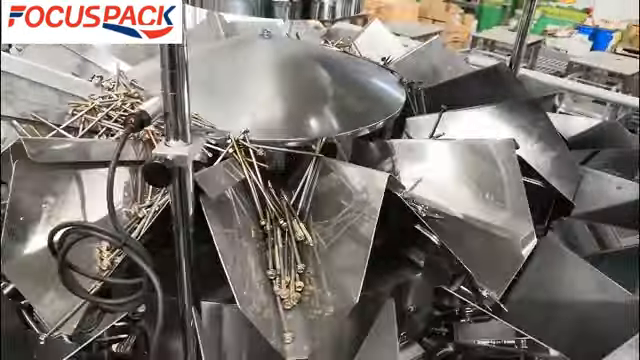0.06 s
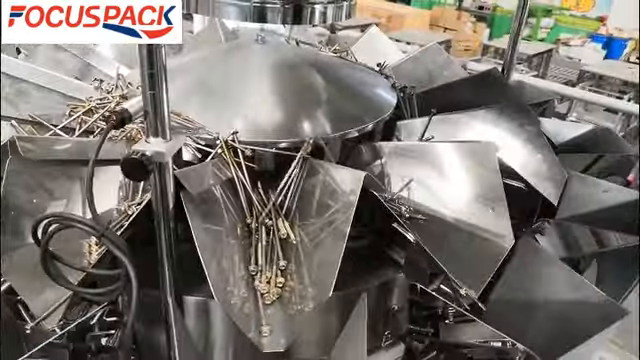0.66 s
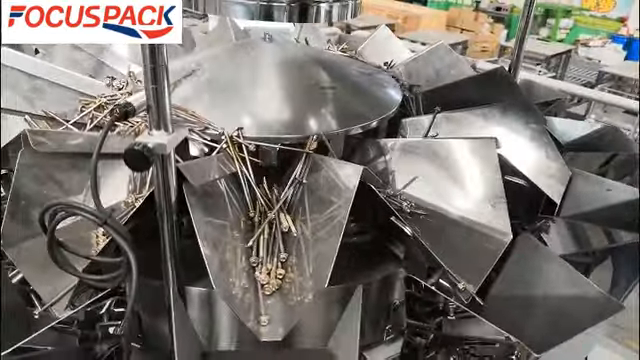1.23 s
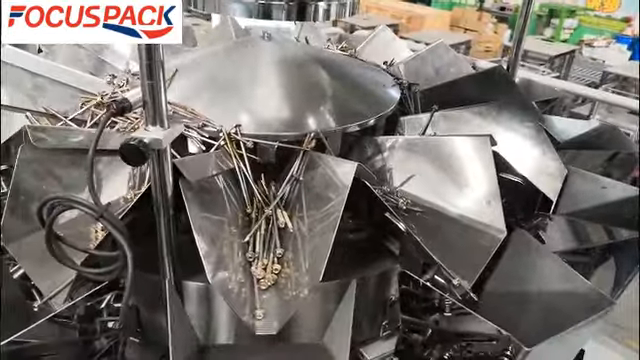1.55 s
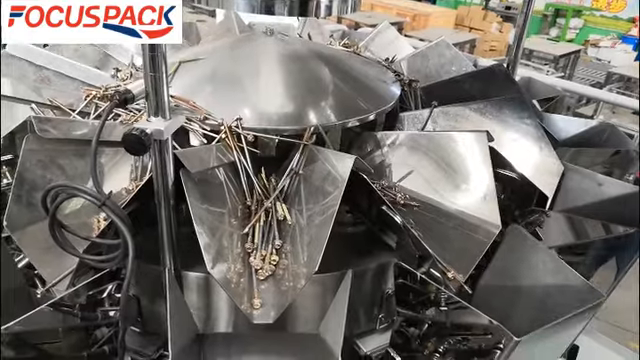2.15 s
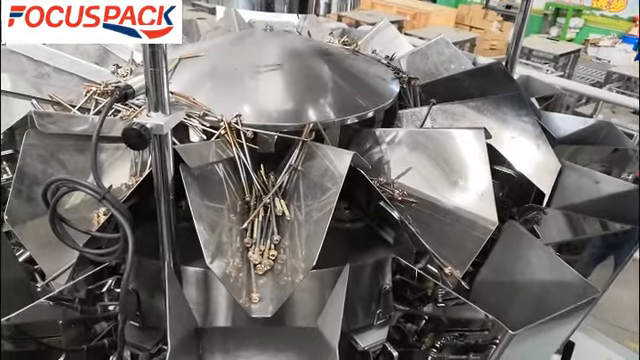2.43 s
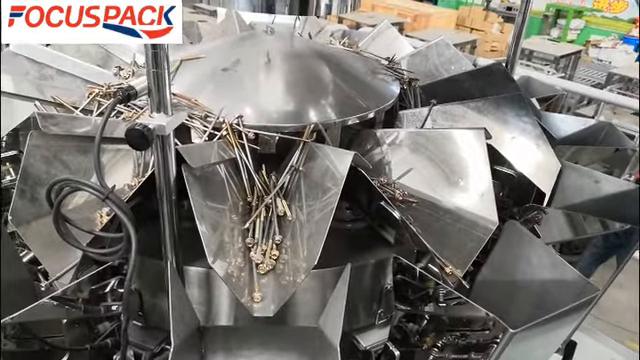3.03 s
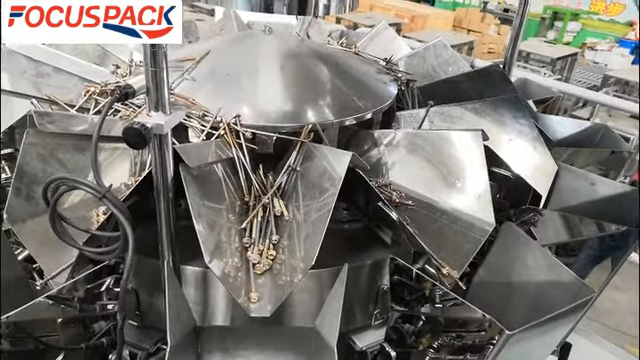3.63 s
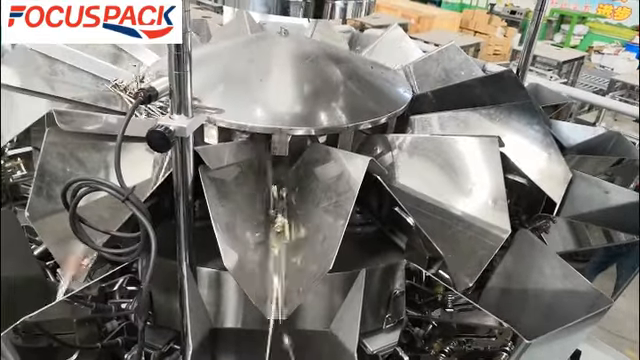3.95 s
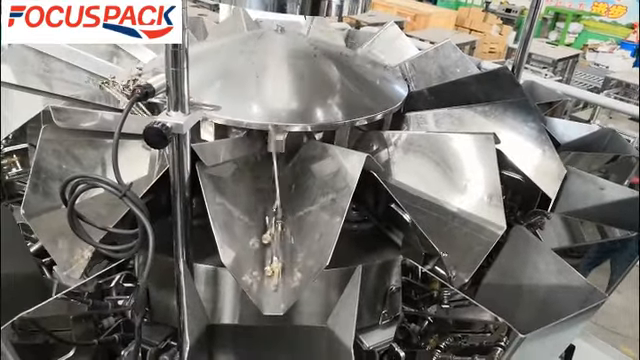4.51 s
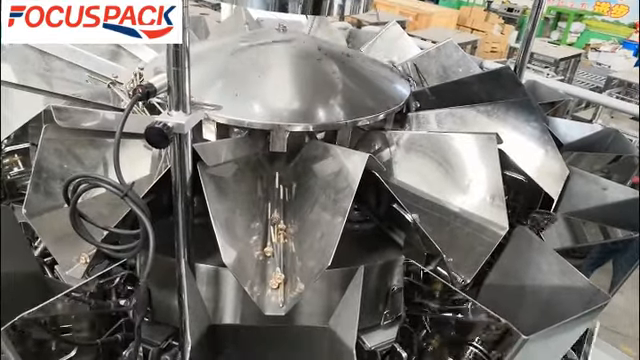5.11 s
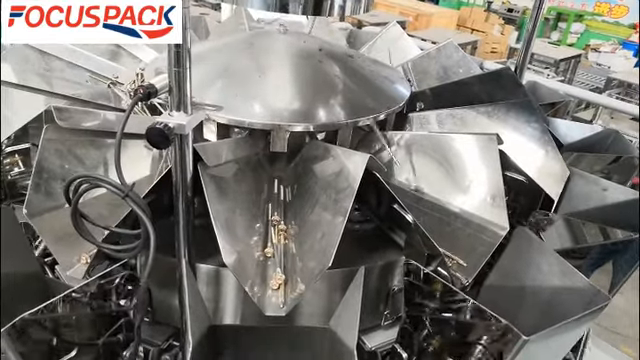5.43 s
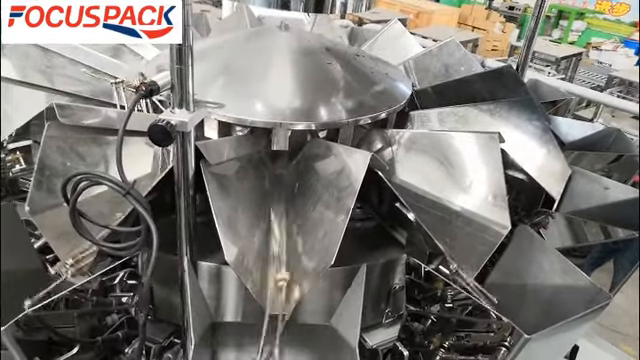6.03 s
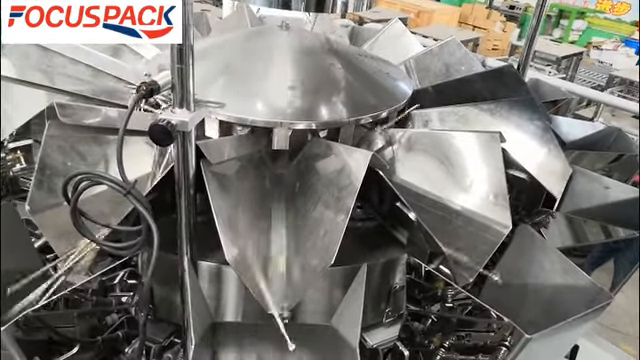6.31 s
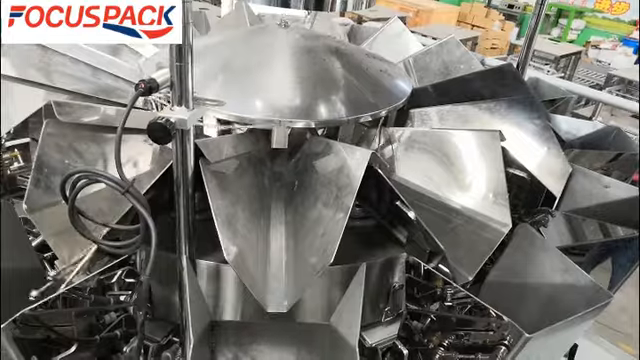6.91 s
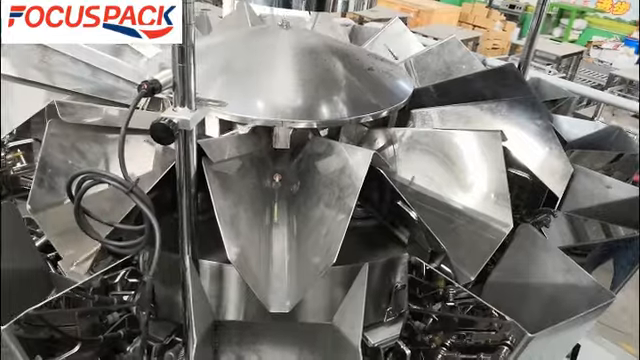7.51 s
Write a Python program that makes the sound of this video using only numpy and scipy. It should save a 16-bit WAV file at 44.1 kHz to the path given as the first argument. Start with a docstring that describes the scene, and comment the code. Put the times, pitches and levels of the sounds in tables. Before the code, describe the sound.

A steel clang opens the sound, close to a stereo microphone at a weighing machine in a factory hall. Until about 3.5 seconds, long screws drop one by one at an uneven pace, several each second, and bounce on sheet-steel pans. Each contact gives a bright clink, a brief ring of pans and chutes, and a dull thud. Hard landings overload the microphone with an abrupt low thump, and some add a hollow tock. From about 3.7 seconds to the end, near 7.8 seconds, the screws slide and tumble in a dense rattle, with a strong hit at 4.4 and a longer ring at 5.4. Loose screws buzz on the shaking pans in short runs, mostly around 2.6 to 3.4, 3.9 to 5 and from 6.2 onward. The drive hums underneath throughout over steady hall noise, swelling a little near 6 seconds.

```python
"""A steel clang, then long screws drop one by one and bounce on the pans of a multihead weighing machine.
From about 3.7 s they slide and tumble in a dense rattle. Each contact rings the screws, chutes and pans
and gives a dull thud; hard landings overload the close stereo microphone with an abrupt low thump.
Loose screws buzz on the shaking pans. The drive hums in the factory hall throughout."""
import sys
import numpy as np
from scipy import signal
from scipy.fft import rfft, irfft
from scipy.io import wavfile
from scipy.ndimage import uniform_filter1d, minimum_filter1d

SR = 44100
rng = np.random.default_rng(int(sys.argv[2]) if len(sys.argv) > 2 else 0)


def pcm_store(signal):
    """Save signal as 16-bit PCM."""
    levels = np.round(np.clip(np.atleast_2d(signal), -1, 1) * 32767)
    wavfile.write(sys.argv[1], SR, levels.astype(np.int16).T)


N = 342216
T = np.arange(N) / SR
RING_T = T[:SR // 2]

# drive hum partials: (frequency [Hz], base level [dB])
HUM_PARTIALS = [(100, -45), (450, -44.5)]
# hum swell: (time [s], gain [dB])
HUM_SWELL = [(0, -6), (1, -12), (3, -10), (3.8, -3), (5, -4), (5.8, 3), (7, 2), (7.76, -3)]
# how hard the heap of screws slides: (time [s], flow [dB])
HEAP_FLOW = [(0, -27), (.45, -28), (.58, -29.5), (.9, -27), (1.75, -29.5), (2.45, -27.5), (2.68, -23),
             (2.82, -25), (3.02, -23), (3.64, -28), (3.72, -19.5), (4.3, -23), (5.1, -22), (5.55, -24.5),
             (5.9, -20.5), (6.4, -20.5), (7.25, -22.5), (7.4, -24), (7.76, -21.5)]
# heavy screws landing: (time [s], strength [dB], thud [dB], bounce decay [s])
HEAVY_DROPS = [(0.0481, -4, -27, 0.0067), (0.067, -6, -24, 0.015), (0.1894, 0.5, -29, 0.0035),
               (0.2275, -11, -42, 0.005), (0.2843, -5.5, -33.5, 0.019), (0.356, -1, -25.5, .006),
               (0.394, -7, -49, 0.037), (0.4877, -4, -23.5, 0.0097), (0.5273, -5, -14.5, 0.0037),
               (.579, -19, -46, .005), (0.6872, -1.5, -32, 0.022), (0.789, 2.5, -18, 0.0095),
               (0.837, -2, -46, 0.0028), (0.8599, -2, -34, 0.01), (0.897, -1, -14, 0.0085),
               (.912, -3, -20.5, 0.015), (0.9855, -0.5, -15.5, 0.0074), (1.004, -3, -20, 0.0044),
               (1.047, -6.5, -39, 0.016), (1.0755, -2, -19.5, 0.0059), (1.1538, -1, -25.5, 0.0027),
               (1.2238, -3, -31, 0.014), (1.256, -5.5, -44, 0.032), (1.29, -11, -40, 0.025),
               (1.309, -0.5, -18, 0.019), (1.46, -7, -35, 0.0084), (1.497, 1, -15.5, 0.0035),
               (1.5298, -4.5, -30, 0.0049), (1.6266, -7.5, -29, 0.029), (1.7723, -2, -16.5, 0.0067),
               (1.826, -6, -37, 0.022), (1.924, -8.5, -33, 0.016), (1.9965, -1.5, -13, 0.0056),
               (2.055, -6.5, -33, 0.0064), (2.1272, 1.5, -24, 0.015), (2.1757, -0.5, -15, 0.0034),
               (2.2219, -2, -16, 0.016), (2.272, 1.5, -15, 0.004), (2.3517, -6, -22.5, 0.008),
               (2.3689, 0, -20.5, 0.016), (2.7033, -10, -36, 0.0075), (2.753, -1.5, -29, 0.0083),
               (2.877, -1.5, -18.5, 0.019), (2.9493, -3, -16.5, 0.03), (2.9789, -2, -18.5, 0.025),
               (3.0984, -4, -24, 0.0044), (3.1771, 1, -15.5, 0.014), (3.27, -11, -44, .008),
               (3.2879, -4.5, -25, 0.018), (3.372, -1.5, -26, 0.011), (3.462, -6.5, -25, 0.0085),
               (3.693, -7, -25, 0.081), (3.778, -18, -21, 0.0083), (3.8392, -2, -22, 0.043),
               (3.8894, -6, -24, 0.04), (3.916, -6, -19.5, 0.022), (4.04, -13, -22.5, 0.013),
               (4.1992, -9, -33, .008), (4.24, -8, -23, 0.047), (4.3743, -9.5, -27, 0.033),
               (4.4334, 2, -12, 0.019), (4.523, -1.5, -21.5, 0.0067), (4.562, -10, -25, 0.0046),
               (4.63, -1.5, -19, 0.016), (4.749, -4, -20.5, 0.032), (4.887, -8.5, -25, 0.024),
               (4.976, -8, -42, .006), (5.01, -5.5, -39, 0.0061), (5.0572, -5.5, -21.5, 0.059),
               (5.0836, -8, -19, 0.044), (5.2187, -1, -17.5, 0.0055), (5.322, -7, -38, 0.0091),
               (5.375, -5, -34, 0.008), (5.414, -6, -23.5, 0.026), (5.5821, -12, -24, 0.019),
               (5.666, -24, -29, 0.013), (5.754, -7, -22, 0.008), (5.858, -2, -19.5, 0.025),
               (5.921, 1, -25, 0.01), (5.94, -5, -20, 0.0087), (6.019, -6, -19.5, 0.0092),
               (6.12, -4, -21, 0.019), (6.183, -1, -21, 0.017), (6.277, -8, -22.5, 0.021),
               (6.3042, -3.5, -20.5, 0.0073), (6.459, -3, -16, 0.0076), (6.5888, -8, -20.5, .016),
               (6.733, -11, -26, 0.008), (6.759, -4, -19, 0.015), (6.919, -15, -32, 0.011),
               (6.936, -6, -23, 0.0073), (6.958, -6, -21, 0.017), (7.0743, -3.5, -21, 0.017),
               (7.1892, -10, -30, 0.0064), (7.223, -2, -29, 0.0073), (7.282, -2, -28, 0.026),
               (7.3194, -3, -24.5, 0.015), (7.34, -10, -24, 0.0067), (7.459, -1.5, -20, 0.039),
               (7.743, -10, -23.5, 0.014)]
# screws tumbling down a chute: (time [s], level [dB], bounce decay [s])
TUMBLES = [(.0024, -16, 0.021), (.048, -16, 0.0045), (0.0665, -15, .02), (0.6873, -15.5, .03),
           (.8963, -15, 0.036), (1.9386, -17, 0.029), (2.0555, -20, 0.056), (2.126, -22.5, 0.061),
           (2.5325, -18, 0.033), (2.7028, -18, 0.014), (4.522, -21, .008), (4.631, -16, .011),
           (5.0575, -17, 0.063), (5.217, -16, 0.0062), (5.757, -15, 0.013), (6.957, -23, 0.0099),
           (7.2815, -23, 0.033), (7.459, -25, .03)]
# single modes of a struck panel or screw: (time [s], frequency [Hz], level [dB], t60 [s])
CLANGS = [(0.003, 2480, -12, 0.13), (0.003, 3670, -12, 0.1), (0.047, 2790, -25, 0.55),
          (0.227, 1490, -18, 0.17), (0.228, 1755, -13.5, 0.17), (0.227, 1430, -28, 0.088),
          (0.227, 3580, -25.5, 0.41), (0.7, 2276, -18, 0.53), (0.688, 3700, -26, 0.58),
          (0.897, 3560, -31, 0.25), (.358, 6600, -13, .07), (.488, 9680, -15, .09), (0.789, 8070, -12, .07),
          (1.157, 8010, -17, 0.12), (1.289, 9390, -18, .06), (1.498, 7130, -14, .06),
          (1.497, 9650, -9, 0.056), (1.53, 8300, -21, 0.24), (1.773, 9470, -14, 0.077),
          (1.924, 9720, -16, .06), (2.128, 8960, -6, .07), (2.352, 9700, -16, .06), (2.885, 6630, -14, .07),
          (3.372, 8080, -17, .07), (3.634, 8100, -15.5, .08), (1.632, 1314, -24.5, 0.58),
          (1.66, 1780, -17.5, 0.26), (1.629, 2730, -23.5, 0.42), (2.706, 1804, -12, 0.12),
          (2.753, 2250, -25, 0.22), (4.255, 7750, -17, .09), (4.478, 5800, -14, 0.083),
          (5.218, 7750, -16, 0.084), (5.41, 1684, -17, 1), (5.411, 1760, -15, 0.65),
          (5.757, 2250, -19, 0.36), (5.94, 8100, -12, 0.083), (6.024, 1766, -14.5, 0.29),
          (6.119, 8400, -17, 0.21), (6.918, 5685, -16, .09), (7.188, 7830, -17, 0.25),
          (7.281, 6370, -13, .08)]
# screws chattering on a pan: (start [s], end [s], mode [Hz], level [dB], strike scatter [ms])
CHATTER_RUNS = [(.25, .5, 2255, -32, .12), (.96, 1.36, 3640, -38, .2), (1.22, 1.34, 2250, -29, .12),
                (2.628, 2.837, 2255, -29, .09), (2.7, 2.8, 1803, -30, .08), (2.9, 3.07, 2255, -26.5, .09),
                (2.949, 3.06, 2070, -26, .1), (3.202, 3.423, 2250, -28.5, .09),
                (3.898, 4.1, 3610, -30.5, .06), (3.98, 4.28, 2250, -25.5, .12),
                (4.36, 4.72, 3600, -30, .065), (4.6, 5.03, 2066, -24.5, .09),
                (4.722, 5.02, 1770, -27.5, .1), (4.8, 5.08, 1538, -28.5, .08),
                (4.867, 5.02, 1690, -28.5, .09), (6.22, 6.6, 2245, -27, .14),
                (6.25, 6.52, 2066, -24.5, .08), (6.892, 7.104, 2245, -30, .1),
                (7.059, 7.42, 2066, -26.5, .08), (7.24, 7.42, 1800, -27, .12),
                (7.253, 7.455, 2265, -27.5, .1), (7.38, 7.72, 1975, -29.5, .16)]
# hollow tocks with some landings: (time [s], level [dB])
TOCKS = [(.528, -20.5), (.79, -27), (.897, -24), (1.498, -25), (1.773, -26), (1.998, -22), (2.226, -21.5),
         (2.369, -24), (3.373, -23.5), (3.779, -25), (3.903, -24), (4.019, -24), (4.454, -22), (4.563, -27),
         (4.633, -20.5), (5.218, -27), (5.923, -25), (6.303, -23), (6.959, -26), (7.083, -25)]
# modes of the steel parts and of the tock: (frequency [Hz], relative level [dB])
CHUTE_MODES = [(2777, -1.0), (2853, -3.0), (3100, -7.0), (3343, -6.0), (3552, -3.0), (3606, 0.0),
               (3682, -3.0), (3784, -3.0), (3956, -7.0), (3994, -7.0), (4317, -7.0)]
SCREW_MODES = [(4608, -3.0), (4651, 0.0), (5065, -2.0), (5447, -3.0), (5539, -3.0), (5830, -2.0),
               (5953, -1.0), (6206, -2.0), (6416, -2.0), (6621, -1.0), (6896, -5.0), (7251, -4.0),
               (8220, -1.0), (8327, -1.0), (8586, -3.0), (8833, -3.0), (9076, -3.0), (9582, -1.0),
               (9614, -3.0), (9727, -3.0), (9910, -6.0), (10125, -8.0), (11983, -17.0), (12042, -19.0),
               (12203, -19.0), (12230, -19.0)]
PAN_MODES = [(1313, -14.5), (1421, -13), (1507, -29), (1539, -2), (1571, -58), (1641, -12), (1690, -10),
             (1765, 5.5), (1803, -3.5), (1986, -22.5), (2067, 6.5), (2217, 3), (2244, 4), (2293, 0.5),
             (2411, -6), (2444, -25.5), (2487, 2), (2535, -18.5), (2680, -0.5), (2707, -2.5)]
TOCK_MODES = [(320, -2), (520, -4), (700, -5), (880, -1), (1040, 0), (1200, 0), (1380, -3)]
# spectra of the hall noise, the contacts and the overload thump: (frequency [Hz], relative level [dB])
HALL_SPECTRUM = [(20, 12), (50, 1), (75, -6), (120, 2), (300, 3), (620, -5.5), (1100, -8), (3000, -21.5),
                 (10000, -34)]
CHUTE_SPECTRUM = [(1200, -39), (2300, -3), (2800, -4.5), (3200, -7), (3700, -5.5), (4200, -7), (6500, -9.5),
                  (13000, -65)]
SCREW_SPECTRUM = [(1500, -33), (3500, -23.5), (4600, -4), (6000, -2), (7000, -3), (8000, -1), (9000, -1),
                  (9800, -2.5), (10500, -9.5), (11600, -16), (12100, -24), (13000, -15.5), (15000, -36)]
PAN_SPECTRUM = [(450, -28), (850, -7), (1350, -5.5), (1600, -0.5), (1800, 0), (2200, 0.5), (2500, -5.5),
                (3100, -22.5), (5000, -27.5), (13000, -32)]
THUD_SPECTRUM = [(12, -22), (30, 0), (110, 0.5), (220, -1), (350, -3), (480, -1), (640, -5), (1100, -12.5),
                 (2000, -15), (5000, -44), (13000, -31)]
CRACK_SPECTRUM = [(100, -16), (600, -12), (1300, -1), (2500, 0), (4000, -2.5), (6500, -5), (10000, -14),
                  (15000, -40)]
THUMP_SPECTRUM = [(12, -18), (35, -1.5), (90, 1), (230, -1), (350, -2), (550, -5.5), (1100, -5.5),
                  (1500, -9), (2500, -13), (5000, -22), (13000, -45)]
# pans round the microphone: (base left lead [ms], left minus right [dB])
PAN_PLACES = [(.6, 1), (-.6, -1), (.75, 0), (.6, 1), (-.7, -1), (.6, 0)]
# balance of the microphone ports: (frequency [Hz], left minus right [dB])
PORT_BALANCE = [(100, 0.5), (700, 1), (1280, 0.5), (2200, -5), (4400, -1), (6500, -5), (8100, -11.5),
                (9500, 10.5), (12000, 3.5), (15000, -2)]

USUAL_FLOW_DB, USUAL_STRENGTH_DB, USUAL_THUD_DB = -23, -4.5, -23
HEAP_JINGLE_DB = -23.5  # at the usual flow
# ring of a landing: (usual level [dB], slope on strength [dB/dB], on thud [dB/dB], on flow [dB/dB])
CHUTE_LAW, PAN_LAW = (-23.5, 0.84, 0.07, 0.37), (-18, 0.39, 0.16, 0.02)
HALF_SIDE = np.array([[.5], [-.5]])  # splits a left-minus-right level between the channels


def amp(db):
    """Decibels to gain."""
    return 10 ** (np.asarray(db) / 20)


def unit(x):
    """Scales to a mean energy of 1 per channel."""
    return x / np.sqrt(np.mean(np.sum(x ** 2, -1)) + 1e-20)


def add(mix, time_s, sound):
    """Mixes a sound in at time_s."""
    part = mix[..., max(0, round(time_s * SR)):][..., :sound.shape[-1]]
    part += sound[..., :part.shape[-1]]


def wander(per_s):
    """Random drift of about unit size."""
    knots_s = np.arange(0, T[-1] + 1, 1 / per_s)
    return np.interp(T, knots_s, rng.standard_normal(len(knots_s)))


def decay(t60_s):
    """Envelope of a ring."""
    return amp(-60 * RING_T / t60_s)


def phasors(count):
    """Random phase for each port and mode."""
    return np.exp(2j * np.pi * rng.random((2, count)))


def colour(spectrum, size=2048):
    """Minimum-phase impulse response with the given spectrum."""
    hz, db = np.transpose(spectrum)
    bins_hz = abs(np.fft.fftfreq(size, 1 / SR)) + 1
    log_gain = np.log(amp(np.interp(np.log(bins_hz), np.log(hz), db)))
    return unit(np.fft.ifft(np.exp(np.conj(signal.hilbert(log_gain)))).real)


def diffuse_noise(size, split_hz=230):
    """Noise at two ports: alike in the bass, unrelated above."""
    mid, side = rng.standard_normal((2, size))
    side = signal.sosfilt(signal.butter(1, split_hz, "high", fs=SR, output="sos"), side)
    return np.array([mid + side, mid - side])


def contact(spectrum, lead_ms, wash_db, wash_t60_s, hall_db, hall_t60_s=0.13):
    """Response to one contact: direct click, short wash between the steel walls, hall."""
    click = np.zeros((2, len(RING_T)))
    lag = round(abs(lead_ms) * SR / 1000)
    click[[0, 1], [0, lag] if lead_ms > 0 else [lag, 0]] = 1
    wash = unit(diffuse_noise(len(RING_T)) * decay(wash_t60_s))
    hall = unit(diffuse_noise(len(RING_T)) * decay(hall_t60_s))
    paths = click + amp(wash_db) * wash + amp(hall_db) * hall
    return unit(signal.fftconvolve(paths, colour(spectrum)[None], axes=1)[:, :len(RING_T)])


def ringing(modes, t60_s, level_db):
    """Long modes, weighted a little differently on each call."""
    hz, db = np.transpose(modes)
    weights = amp(db + 0.99 * rng.standard_normal(len(hz))) * phasors(len(hz))
    tones = (weights @ np.exp(2j * np.pi * hz[:, None] * RING_T)).real
    return amp(level_db) * unit(tones * decay(t60_s))


def radiate(force, response):
    """Each pan's force reaches the microphone through its own response(lead_ms)."""
    out = np.zeros((2, N))
    for push, (lead_ms, side_db) in zip(force, PAN_PLACES):
        out += amp(HALF_SIDE * side_db) * signal.oaconvolve(push[None], response(lead_ms), axes=1)[:, :N]
    return out


def drive_and_hall(hall_db=-37):
    """Wavering hum of the drive over steady hall noise."""
    hall = signal.oaconvolve(diffuse_noise(N), colour(HALL_SPECTRUM)[None], axes=1)[:, :N]
    hum = sum(amp(db + 4 * wander(9)) * np.sin(2 * np.pi * hz * T + 1.2 * wander(14))
              for hz, db in HUM_PARTIALS)
    return amp(hall_db) * hall + hum * amp(np.interp(T, *np.transpose(HUM_SWELL)))


def heap_flow(surge_db=2):
    """The heap slides in fits and starts; returns dB above the usual flow."""
    return np.interp(T, *np.transpose(HEAP_FLOW)) - USUAL_FLOW_DB + surge_db * wander(per_s=13)


def landings(flow_db, strays_per_s=6, stray_bounce_s=0.013):
    """Heavy drops plus light strays that hit harder with the flow; columns as HEAVY_DROPS."""
    slots_s = np.arange(0, T[-1], 1 / strays_per_s)
    offset, size, weight = rng.random((len(slots_s), 3)).T
    times_s = slots_s + offset / strays_per_s
    local_flow_db = np.interp(times_s, T, flow_db)
    span_db = np.sqrt(12)  # uniform draw with 1 dB deviation
    strength_db = -8.5 + 1.2 * local_flow_db + span_db * (size - .5)
    thud_db = -34.5 + 1.8 * local_flow_db + span_db * (size + weight - 1)
    strays = np.c_[times_s, strength_db, thud_db, np.full(len(times_s), stray_bounce_s)]
    return np.vstack([HEAVY_DROPS, strays])


def ring_db(law, drops, flow_db):
    """Stronger, heavier landings and those on a moving heap ring the steel more."""
    times_s, strength_db, thud_db, _ = drops.T
    excess_db = np.c_[strength_db - USUAL_STRENGTH_DB, thud_db - USUAL_THUD_DB,
                      np.interp(times_s, T, flow_db)]
    return law[0] + excess_db @ law[1:]


def forces(heap_db, blows, per_s, spread_db, first_hit, bounces_per_s=2200):
    """Force on each pan: heap clicks plus bouncing blows (time [s], level [dB], bounce decay [s])."""
    count = len(PAN_PLACES)
    sizes = amp(spread_db * np.clip(rng.standard_normal((count, N)), -2, 2))
    sizes *= rng.choice([-1, 1], (count, N))
    clicks = sizes * (rng.random((count, N)) < per_s / count / SR)
    force = amp(heap_db) * unit(clicks) * np.sqrt(N / count)
    t = T[:SR // 6]
    for time_s, db, bounce_s in blows:
        bounces = rng.choice([-1, 1], len(t)) * (rng.random(len(t)) < bounces_per_s / SR)
        blow = unit(bounces * np.exp(-t / bounce_s))
        blow[0] = -first_hit
        add(force[rng.integers(count)], time_s, amp(db) * unit(blow) * np.sqrt(bounce_s * SR))
    return force


def chutes(flow_db, drops, heap_db=-24, bounce_stretch=2.14):
    """Hard clank of the narrow chutes, where bounces last longer."""
    times_s, _, _, bounce_s = drops.T
    landed = np.c_[times_s, ring_db(CHUTE_LAW, drops, flow_db), bounce_stretch * bounce_s]
    blows = np.vstack([landed, TUMBLES])
    force = forces(heap_db + flow_db, blows, per_s=700, spread_db=1.5, first_hit=0.11)
    return radiate(force, lambda lead_ms: (
        contact(CHUTE_SPECTRUM, lead_ms, wash_db=4.3, wash_t60_s=0.073, hall_db=-9.5)
        + ringing(CHUTE_MODES, t60_s=0.26, level_db=-10)))


def screws(flow_db, drops, landing_gain_db=-13):
    """Bright jingle of the steel shanks."""
    times_s, strength_db, _, bounce_s = drops.T
    blows = np.c_[times_s, strength_db + landing_gain_db, bounce_s]
    force = forces(HEAP_JINGLE_DB + flow_db, blows, per_s=770, spread_db=0.5, first_hit=0.23)
    return radiate(force, lambda lead_ms: (
        contact(SCREW_SPECTRUM, lead_ms, wash_db=7, wash_t60_s=.03, hall_db=-5)
        + ringing(SCREW_MODES, t60_s=0.79, level_db=-12)))


def pans(flow_db, drops, heap_db=-23):
    """Wide sheet-steel pans ring on between blows."""
    times_s, _, _, bounce_s = drops.T
    blows = np.c_[times_s, ring_db(PAN_LAW, drops, flow_db), bounce_s]
    force = forces(heap_db + flow_db, blows, per_s=600, spread_db=0.5, first_hit=0.3)
    return radiate(force, lambda lead_ms: (
        contact(PAN_SPECTRUM, lead_ms, wash_db=0.58, wash_t60_s=0.1, hall_db=-7)
        + ringing(PAN_MODES, t60_s=.22, level_db=-5.5)))


def thuds(flow_db, drops, heap_db=-32.5, flow_slope=3.05, landing_gain_db=3.5):
    """Hard contacts give a dull push with no ring; few and uneven in the heap."""
    times_s, _, thud_db, bounce_s = drops.T
    blows = np.c_[times_s, thud_db + landing_gain_db, bounce_s]
    force = forces(heap_db + flow_slope * flow_db, blows, per_s=150, spread_db=4, first_hit=0.13)
    return radiate(force, lambda lead_ms: contact(
        THUD_SPECTRUM, lead_ms * 1.41, wash_db=-12, wash_t60_s=.035, hall_db=-21))


def clangs():
    """One panel or screw sings after a square blow."""
    out = np.zeros((2, N))
    for time_s, hz, db, t60_s in CLANGS:
        phase_rad = rng.uniform(-1, 1, (2, 1))
        add(out, time_s, amp(db) * np.sin(2 * np.pi * hz * RING_T + phase_rad) * decay(t60_s))
    return out


def clinks(flow_db, drops, loose_per_s=60, mode_count=11):
    """A screw that lands or springs free rings briefly at pitches of its own."""
    loose = rng.random(N) < loose_per_s / SR
    scatter_db = 2.5 * np.clip(rng.standard_normal(loose.sum()), -2, 2)
    loose_db = HEAP_JINGLE_DB + flow_db[loose] + 1.2 + scatter_db
    landed_s, landed_db = drops[:, 0], drops[:, 1] - 11.5
    t, out = T[:SR // 8], np.zeros((2, N))
    for time_s, db in zip(np.r_[landed_s, T[loose]], np.r_[landed_db, loose_db]):
        hz = rng.triangular(3600, 8600, 10400, (mode_count, 1))
        t60_s = rng.uniform(.03, .11, (mode_count, 1))
        weights = amp(rng.uniform(-6, 3, (2, mode_count))) * phasors(mode_count)
        modes = np.exp((2j * np.pi * hz - np.log(1000) / t60_s) * t)
        add(out, time_s, amp(db) / 2 * (weights @ modes).real)
    return out


def cracks(gain_db=-1, energy_s=.006):
    """A heavy screw meets the wall head first: one dry crack ahead of its bounces."""
    force = np.zeros((len(PAN_PLACES), N))
    for time_s, _, thud_db, _ in HEAVY_DROPS:
        impulse = amp(thud_db + gain_db) * np.sqrt(energy_s * SR)
        force[rng.integers(len(PAN_PLACES)), round(time_s * SR)] -= impulse
    return radiate(force, lambda lead_ms: contact(
        CRACK_SPECTRUM, lead_ms, wash_db=5, wash_t60_s=.022, hall_db=-14))


def pings(modes, law, flow_db, drops, t60_s=0.12, gain_db=-7.5):
    """Each landing strikes another spot, which favours two of the part's modes."""
    hz, db = np.transpose(modes)
    t, out = T[:SR // 4], np.zeros((2, N))
    for time_s, level_db in zip(drops[:, 0], ring_db(law, drops, flow_db)):
        pair_hz = rng.choice(hz, size=2, p=amp(db) / amp(db).sum())
        tones = (phasors(2) @ np.exp(2j * np.pi * pair_hz[:, None] * t)).real
        add(out, time_s, amp(level_db + gain_db) * tones * decay(t60_s)[:len(t)])
    return out


def overload_thumps(drops, gain_db=2.5, delay_s=.002, gap_s=.006, second_gain=0.8):
    """Abrupt low thump as a landing overloads the close microphone: two one-sided pushes."""
    force = np.zeros((len(PAN_PLACES), N))
    for time_s, _, thud_db, bounce_s in drops:
        push = np.zeros(SR // 20)
        push[0] = -1
        push[round(gap_s * SR * rng.uniform(.4, 1.6))] = -second_gain
        size = amp(thud_db + gain_db) * np.sqrt(np.clip(bounce_s, .002, .012) * SR)
        add(force[rng.integers(len(PAN_PLACES))], time_s + delay_s, size * unit(push))
    return radiate(force, lambda lead_ms: contact(
        THUMP_SPECTRUM, lead_ms * 1.4, wash_db=-16, wash_t60_s=.025, hall_db=-28))


def chatter(shake_hz=76.8, t60_s=0.075, spread_db=4.5, edge_fade_db=6):
    """The pan tosses a screw once per shake, so one mode buzzes in step with the feeder."""
    out = np.zeros((2, N))
    for start_s, end_s, hz, db, scatter_ms in CHATTER_RUNS:
        length_s = end_s - start_s
        crests_s = np.round(np.arange(0, length_s, 1 / shake_hz) * hz) / hz  # of the ringing pan
        times_s = abs(crests_s + scatter_ms / 1000 * rng.standard_normal(len(crests_s)))
        fade_db = edge_fade_db * (2 * times_s / length_s - 1) ** 2
        strike_db = spread_db * rng.standard_normal(len(times_s)) - fade_db
        strikes = np.zeros(round(times_s.max() * SR) + 1)
        strikes[np.round(times_s * SR).astype(int)] = amp(strike_db)
        mode = unit(np.sin(2 * np.pi * hz * RING_T + rng.uniform(-1.23, 1, (2, 1))) * decay(t60_s))
        buzz = signal.fftconvolve(strikes[None], mode, axes=1)
        add(out, start_s, amp(db) * unit(buzz) * np.sqrt(length_s * SR))
    return out


def tocks(t60_s=0.031, energy_s=.01):
    """Short hollow low-mid tock with some landings, pitched a little differently each time."""
    hz, db = np.transpose(TOCK_MODES)
    out = np.zeros((2, N))
    for time_s, level_db in TOCKS:
        detuned_hz = hz * rng.uniform(.9, 1.1) * rng.uniform(.92, 1.08, len(hz))
        gains = amp(db + rng.uniform(-4, 4, len(hz))) * rng.choice([-1, 1], len(hz))
        weights = gains * np.exp(1j * rng.uniform(-.9, .9, (2, len(hz))))
        tock = (weights @ np.exp(2j * np.pi * detuned_hz[:, None] * RING_T)).imag * decay(t60_s)
        add(out, time_s, amp(level_db) * unit(tock) * np.sqrt(energy_s * SR))
    return out


def scene():
    """The whole machine at the two microphone ports."""
    flow_db = heap_flow()
    drops = landings(flow_db)
    mix = pings(PAN_MODES, PAN_LAW, flow_db, drops) + pings(CHUTE_MODES, CHUTE_LAW, flow_db, drops)
    for source in (screws, clinks, chutes, pans, thuds):
        mix += source(flow_db, drops)
    mix += overload_thumps(drops) + tocks() + cracks() + clangs() + chatter() + drive_and_hall()
    balance_db = np.interp(np.fft.rfftfreq(N, 1 / SR), *np.transpose(PORT_BALANCE))
    return irfft(rfft(mix) * amp(HALF_SIDE * balance_db), N)


def record(dry, ceiling=.93, window_samples=130, cutoff_hz=15300):
    """Fast peak limiter, then low-pass."""
    allowed = np.minimum(1, ceiling / (abs(dry).max(0) + 1e-9))
    gain = uniform_filter1d(minimum_filter1d(allowed, window_samples), window_samples)
    lowpass = signal.firwin(401, cutoff_hz, window=("kaiser", 8), fs=SR)
    return signal.oaconvolve(dry * gain, lowpass[None], "same")


dry = scene()
out = record(dry)
pcm_store(out)
```